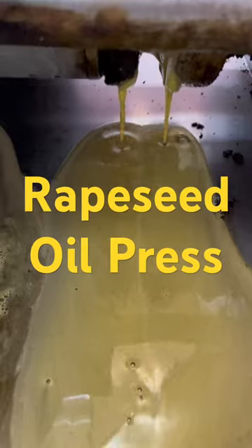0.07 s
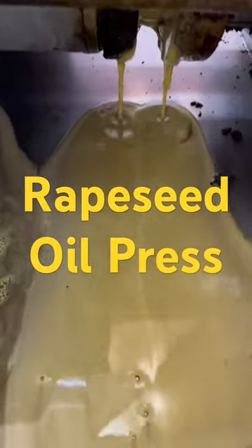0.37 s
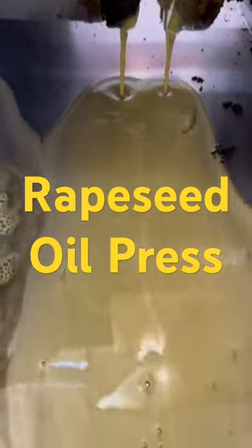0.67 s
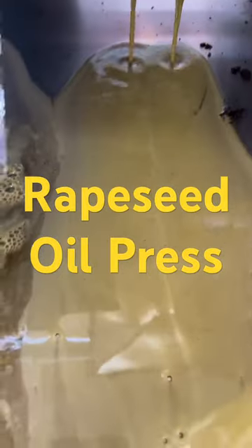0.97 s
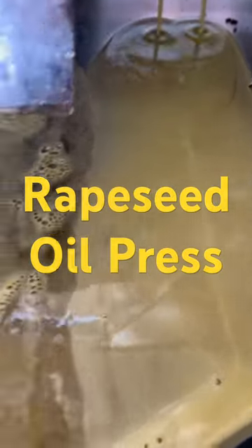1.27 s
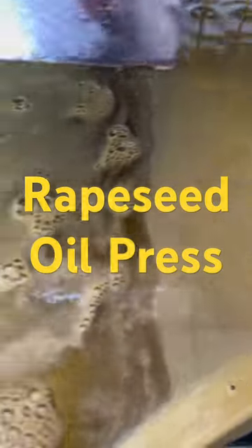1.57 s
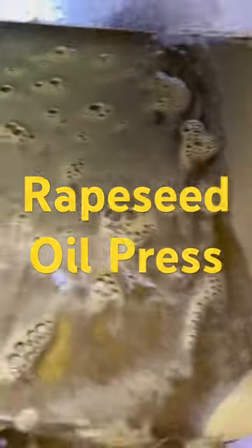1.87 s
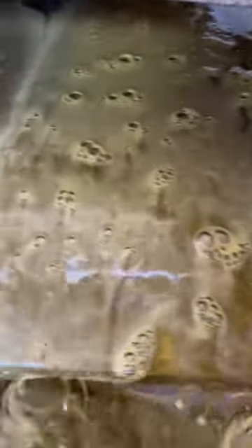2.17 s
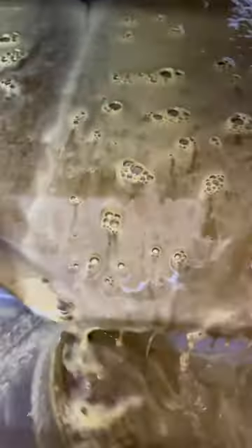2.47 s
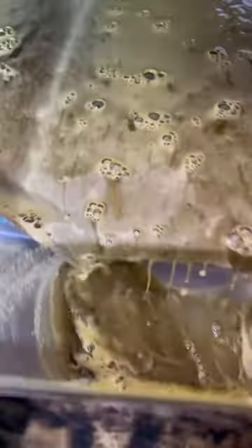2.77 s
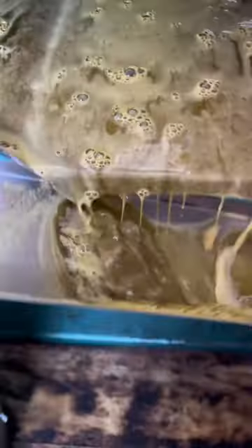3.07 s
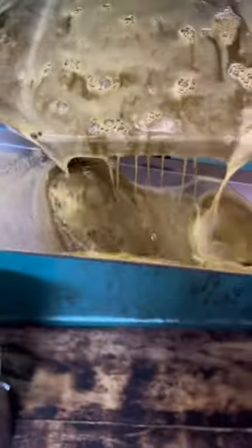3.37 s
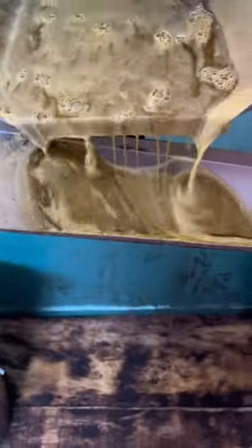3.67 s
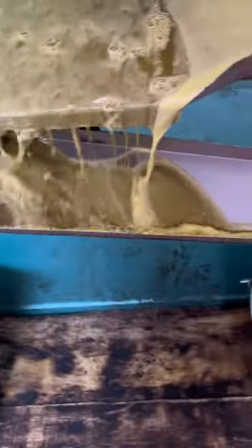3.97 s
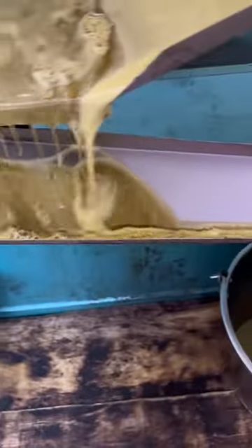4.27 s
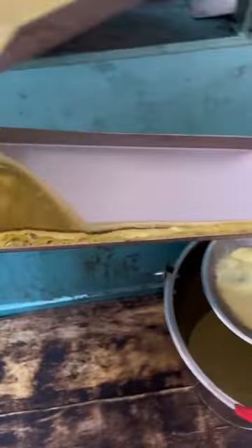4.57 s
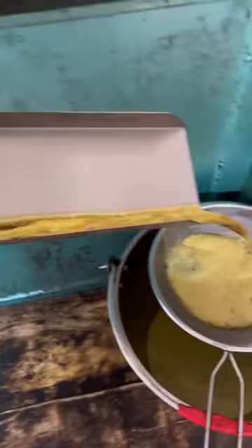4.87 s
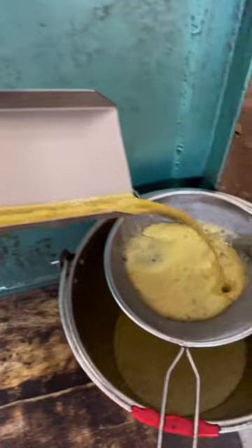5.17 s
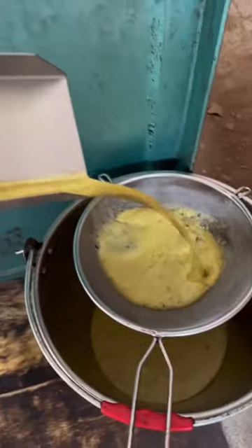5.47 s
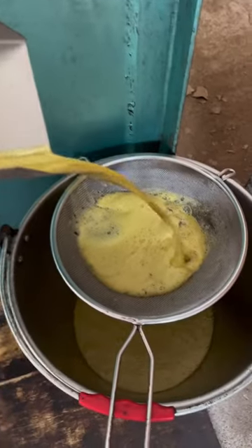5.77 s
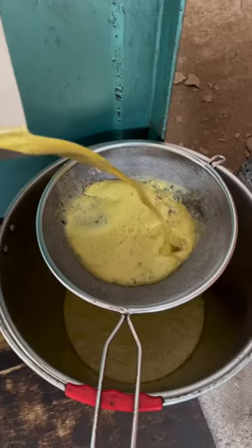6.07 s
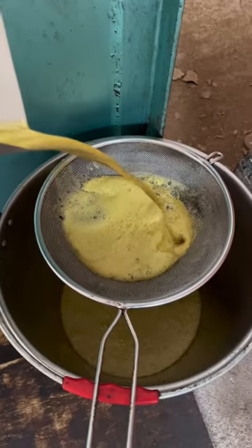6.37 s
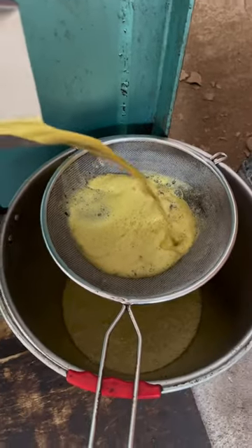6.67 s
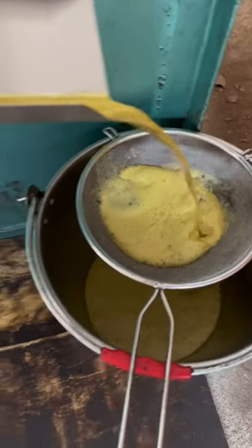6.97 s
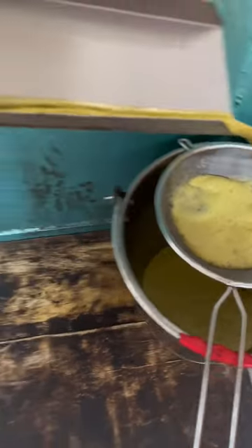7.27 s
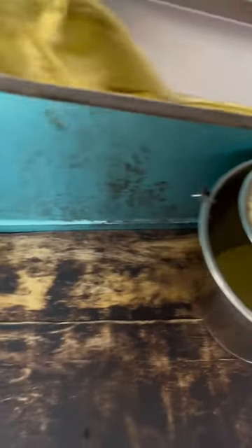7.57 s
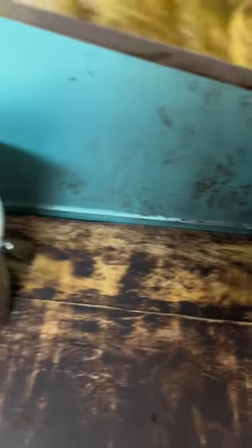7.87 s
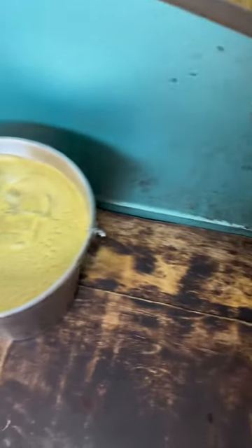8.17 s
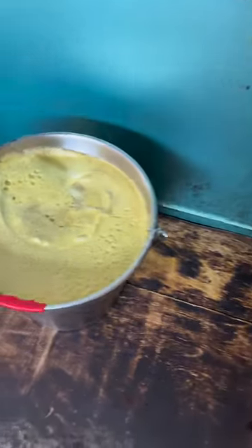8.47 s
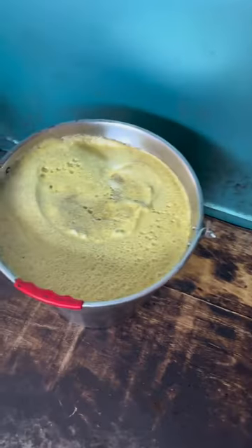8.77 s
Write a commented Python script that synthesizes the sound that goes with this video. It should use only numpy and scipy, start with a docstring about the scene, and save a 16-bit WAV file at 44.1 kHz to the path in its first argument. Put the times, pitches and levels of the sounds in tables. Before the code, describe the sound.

A screw oil press runs throughout in a workshop: a low gear drone and hum, a rumbling frame and a mid-pitched motor whine, with a soft hiss of grinding seed and a very faint fizz of froth above. The whine swells and dips as the microphone moves along the machine, gradually receding. The seed cake gives a faint squeak around 0.7 seconds and a sharp crack at about 1 second. A knock follows at 1.3 seconds, then a quick, louder cluster of clacking thuds at 1.5. From about 3.4 seconds, oil spits in scattered small, bright ticks. Faint scrapes come near 3.8 and 8.5 seconds, with a brief crack at 6.5. Between roughly 4.7 and 7.3 seconds, oil splashes very lightly into a sieve while the low drone grows fuller. The machine is still running at the end, near 9 seconds.

```python
"""Screw oil press in a workshop.

The motor's rotor bars whine over meshing gears and a rumbling frame. The screw grinds seed with a hiss,
the seed cake cracks, something knocks and settles, and the oil froths, spits and splashes faintly.
The listener moves along the oil tray to a sieve, crossing the nodes and crests of the whine."""
import sys
import numpy as np
from scipy import signal
from scipy.fft import rfft, irfft
from scipy.io import wavfile
from scipy.ndimage import uniform_filter1d

SR = 44100
rng = np.random.default_rng(int(sys.argv[2]) if len(sys.argv) > 2 else 0)


def dump(signal):
    """Clip the signal to [-1, 1] and save it as 16-bit WAV at the path in sys.argv[1]."""
    limited = np.clip(np.atleast_2d(signal).T, -1, 1)
    pcm = np.round(limited * 32767).astype(np.int16)
    wavfile.write(sys.argv[1], SR, pcm)


N = 389403
T = np.arange(N) / SR
HZ = np.fft.rfftfreq(N, 1 / SR)

MAINS_HZ, SHAFT_HZ, MESH_HZ = 50., 24.48, 77.18
ROTOR_BARS, PINION_TEETH = 30, 14
PINION_HZ = MESH_HZ / PINION_TEETH
AT_OUTLET_S, AT_BARREL_S, AT_SIEVE_S = (-1, 1.24), (1.215, 1.705), (4.3, 7.1)  # listener's stops


def amp(db):
    """Decibels to gain."""
    return 10 ** (np.asarray(db) / 20)


def unit(x):
    """Scale to rms 1."""
    return x / np.sqrt(np.mean(x ** 2) + 1e-20)


def envelope(points):
    """Gain over time from (time [s], level [dB]) points."""
    return amp(np.interp(T, *np.transpose(points)))


def colour(points):
    """Gain over frequency, interpolated on a log axis."""
    hz, db = np.transpose(points)
    return amp(np.interp(np.log(HZ + 1), np.log(hz), db))


def resonances(modes):
    """Gain over frequency of modes summed in power."""
    return np.sqrt(sum(amp(db) ** 2 / (1 + ((HZ - hz) / width) ** 2) ** 2 for hz, width, db in modes))


def drift(rate_hz):
    """Slow random wander, rms 1."""
    return unit(irfft(rfft(rng.standard_normal(N)) * np.exp(-(HZ / rate_hz) ** 2), N))


def tone(hz, clock, lead_rad=0):
    """Sine of rms 1 on a machine's clock."""
    return np.sqrt(2) * np.cos(2 * np.pi * (hz * clock + rng.random()) + lead_rad)


def shaft_clock(wobble, rate_hz):
    """Time as a shaft keeps it: load makes the speed waver."""
    return T + np.cumsum(wobble * drift(rate_hz)) / SR


# (frequency [Hz], coherence [0-1], left lead [rad], left minus right [dB])
STEREO_FIELD = [(60, .995, 0, -.5), (350, .96, -.2, -1.5), (700, .7, -.3, 1), (1900, .62, -.3, 0),
                (2250, .15, -1.2, -1), (2600, .42, -2.4, -3), (4400, .3, -3.2, -3), (5300, .65, -4, -4),
                (6100, .9, -3.1, 0), (14600, .9, 9.4, 0)]
def stereo(first, second):
    """Mix two unrelated spectra into partly coherent left and right signals."""
    hz, *columns = np.transpose(STEREO_FIELD)
    coherence, lead, tilt_db = (np.interp(HZ, hz, column) for column in columns)
    right = (coherence * first + np.sqrt(1 - coherence ** 2) * second) * np.exp(-1j * lead)
    return irfft(np.array([first * amp(tilt_db / 2), right * amp(-tilt_db / 2)]), N)


def noise(spectrum, repeat=0):
    """Coloured stereo noise, rms 1; a share of its power repeats each pinion turn."""
    white = rng.standard_normal((2, N))
    looped = white[:, np.arange(N) % round(SR / PINION_HZ)]
    shake = np.sqrt(1 - repeat) * white[:, ::-1] + np.sqrt(repeat) * looped
    return unit(stereo(*(rfft(shake) * spectrum)))


def patchy(x, patch_db, size):
    """Bands swell and fade apart; a larger size gives narrower, slower patches."""
    bands = signal.stft(x, nperseg=size)[2]
    field = uniform_filter1d(rng.standard_normal(bands.shape[1:]), size=3, axis=0)
    field = unit(uniform_filter1d(field, size=14, axis=1))
    return unit(signal.istft(bands * amp(patch_db * field), nperseg=size)[1][:, :N])


def near(stop, move_s=.13):
    """1 while the listener is at a stop, ramping to 0 outside it."""
    start, end = stop
    return np.clip(np.minimum(T - start, end - T) / move_s + .5, 0, 1)


def along_tray(levels, wander_db=0):
    """Gain of a source as the listener moves from stop to stop."""
    base_db, *boosts_db = levels
    stops = (AT_OUTLET_S, AT_BARREL_S, AT_SIEVE_S)
    boost_db = sum(db * near(stop) for db, stop in zip(boosts_db, stops))
    return amp(base_db + boost_db + wander_db * drift(.28))


# (time [s], half-width [s], left gain [dB], right gain [dB], phase direction [+-1])
NODES_AND_CRESTS = [(.3, 0.34, -3.5, 1, -1), (1.32, 0.56, -9.5, 0.5, 1), (1.839, 1, -0.5, -22.5, 1),
                    (2.66, 0.16, 2, 3, -1), (3.52, 0.85, -4, -15, -1), (4.53, 0.1, 2.5, 2.5, 1),
                    (5.19, 0.93, -3.5, -23.5, -1), (6.85, 0.79, -2, -15, 1), (7.69, 0.13, 0.5, -11.5, 1),
                    (8.03, 0.24, 1, 4, -1), (8.74, 0.62, -12.5, -9, 1)]
def standing_wave(start_db=(-16.5, -16), recede_db_per_s=-.78):
    """Complex stereo gain of the receding whine: at a node, reflections cancel it and swing its phase."""
    gain = amp(np.array(start_db)[:, None] + recede_db_per_s * T) + 0j
    for s, width, left_db, right_db, direction in NODES_AND_CRESTS:
        depth = 1 - amp([[left_db], [right_db]])
        gain *= 1 - depth / (1 + 1j * np.sign(direction) * (T - s) / width)
    return gain


# (offset [shaft orders], offset [multiples of twice mains], level [dB])
SLOT_SIDEBANDS = [(0, -3, -47), (1, -2, -48.5), (0, 0, -47.8), (1, 1, -53.5), (0, 2, -48.6)]
# (base level [dB], outlet boost [dB], barrel boost [dB], sieve boost [dB])
LOW_SIDEBAND_LEVELS = (-52, 5.5, -10, 10)
# (time [s], level [dB])
OCTAVE_LEVELS = [(1.7, -56), (2.04, -51.5), (2.73, -57.5), (4.11, -47.5), (4.57, -64.5), (5.95, -45.5),
                 (7.18, -59), (7.69, -43.5), (7.73, -53), (8.8, -58)]
# (time [s], relative level [dB])
UPPER_SLOT_LEVELS = [(1.7, -68), (3.34, -51.5), (4.61, -61.5), (4.8, -46), (5.08, -68), (6.07, -53.5),
                     (7.45, -57), (7.91, -63), (8.13, -51), (8.8, -58)]
def motor(flutter_db=-41, upper_slot_hz=1803.6, overtone_db=-63, shimmer=.19):
    """Rotor bars whine past the stator slots, with sidebands from mains and shaft."""
    clock = shaft_clock(wobble=.001, rate_hz=12.2)
    slot_hz = ROTOR_BARS * SHAFT_HZ
    whine_hz = slot_hz + 2 * MAINS_HZ
    wave = standing_wave()
    lead = np.outer([.5, -.5], np.angle(wave[0] / wave[1]))
    load_throb = amp(-46.5) * tone(SHAFT_HZ, clock) + amp(-49) * tone(PINION_HZ, clock)
    flutter = amp(flutter_db) * np.array([drift(4.1), drift(17)])  # room scatter, exposed at nodes
    out = (abs(wave) + load_throb + flutter) * tone(whine_hz, clock, lead)
    for shaft, mains, db in SLOT_SIDEBANDS:
        hz = slot_hz + round(shaft) * SHAFT_HZ + round(mains) * 2 * MAINS_HZ
        out += amp(db + 2 * np.array([drift(1.5), drift(.72)])) * tone(hz, clock)
    out += along_tray(LOW_SIDEBAND_LEVELS) * tone(slot_hz - 4 * MAINS_HZ, clock)
    out += envelope(OCTAVE_LEVELS) * (1 + shimmer * drift(36)) * tone(2 * whine_hz, clock, .4 * lead)
    upper_gain = envelope(UPPER_SLOT_LEVELS) * amp(2.5) * (1 + shimmer * drift(36))
    out += upper_gain * tone(upper_slot_hz, clock, -.4 * lead)
    overtones = drift(14) * tone(2538, clock, 2 * lead) + drift(2.9) * tone(3 * whine_hz, clock, lead)
    return out + amp(overtone_db) * overtones


# mesh harmonic 2: (time [s], level [dB])
BOOM_LEVELS = [(0.1, -22.5), (0.65, -18.5), (1.15, -22.5), (1.6, -29.5), (2.2, -33), (2.7, -24), (3.7, -33),
               (4.75, -22.5), (6.55, -20), (8.2, -31)]
# mesh harmonic 3: (time [s], level [dB])
DRONE_LEVELS = [(2.0, -32.5), (3.6, -36), (5.3, -29.5), (6.5, -26.5), (7.9, -32), (8.7, -26.5)]
# (harmonic number, level [dB], outlet boost [dB], sieve boost [dB])
WEAK_HARMONICS = [(1, -32, 1.5, 1), (4, -46.5, 10, -4), (5, -42.5, -10.5, 2), (6, -41, -7, -13.5),
                  (9, -63, -5, -11)]
def gears(clock, eccentric_rad=.13, scatter_rad=.31):
    """Mesh harmonics sing in the frame; the off-centre pinion sways their phase once a turn."""
    sway = eccentric_rad * tone(PINION_HZ, clock)
    out = envelope(BOOM_LEVELS) * tone(2 * MESH_HZ, clock, sway)
    out += envelope(DRONE_LEVELS) * tone(3 * MESH_HZ, clock, 2 * sway)
    for k, db, outlet_db, sieve_db in WEAK_HARMONICS:
        gain = amp(db + outlet_db * near(AT_OUTLET_S) + sieve_db * near(AT_SIEVE_S) + 2 * drift(1.4))
        out += gain * tone(round(k) * MESH_HZ, clock, np.sqrt(k) * sway + scatter_rad * drift(7))
    return out


# (frequency [Hz], level [dB], outlet boost [dB], sieve boost [dB])
HUM_TONES = [(51.4, -39, -15.5, 2), (70.4, -43.5, 10.5, 1), (73.24, -29.5, -9, -3.5),
             (81.2, -36, -11, -0.5), (99.5, -31, -4.5, 2), (103, -43, -13, 6), (124.8, -31, -0.5, -3),
             (151.6, -35.5, -3, -0.5)]
def hum(clock):
    """Mains, belt and shafts hum in low tones that beat against the gears."""
    out = np.zeros(N)
    for hz, db, outlet_db, sieve_db in HUM_TONES:
        gain = amp(db + outlet_db * near(AT_OUTLET_S) + sieve_db * near(AT_SIEVE_S) + .9 * drift(1.2))
        out += gain * tone(hz, clock)
    return out


def drive():
    """Gears and hum on one wavering clock, slightly to the right."""
    clock = shaft_clock(wobble=.00085, rate_hz=4.1)
    return (gears(clock) + hum(clock)) * amp([[-.6], [.6]])


# (frequency [Hz], relative level [dB])
RUMBLE_SPECTRUM = [(20, -20), (40, -15.5), (52, 4), (85, 6), (195, -2), (270, 3), (440, -1), (510, -4),
                   (850, -6), (1200, -14.5), (2000, -50.5)]
# both: (frequency [Hz], half-width [Hz], relative level [dB])
FRAME_MODES = [(112, 14, 8.5), (132.6, 8.5, 10), (150.6, 10, 9.5), (172.2, 9, 11), (224, 16, 9),
               (399, 49, 1)]
CHURN_MODES = [(370, 25, 0)]
# both: (relative level [dB], outlet boost [dB], barrel boost [dB], sieve boost [dB])
BODY_LEVELS = (-20.5, 1.5, 0, -0.5)
PANEL_LEVELS = (-26.5, 3.5, 3, 0.5)
# (time [s], level [dB])
CHURN_LEVELS = [(3.9, -48), (4.5, -32.5), (6.5, -33.5), (7.8, -38.5), (8.2, -33)]
def frame(split_hz=260, repeat=.3, recede_db_per_s=-.16):
    """The screw shakes the frame: the body booms, the panels rattle and one of them churns."""
    spectrum = colour(RUMBLE_SPECTRUM) * np.sqrt(1 + resonances(FRAME_MODES) ** 2)
    low_share = 1 / (1 + (HZ / split_hz) ** 8)
    body = noise(spectrum * np.sqrt(low_share), repeat)
    body *= along_tray(BODY_LEVELS, wander_db=1.56) * amp(-3)
    # standing waves pick out narrow bands that shift as the listener moves
    panels = patchy(noise(spectrum * np.sqrt(1 - low_share), repeat), patch_db=4, size=8192)
    panels *= along_tray(PANEL_LEVELS) * amp(-1.78 + recede_db_per_s * T)
    churn = noise(resonances(CHURN_MODES)) * envelope(CHURN_LEVELS)
    throb = 1 + .024 * tone(MESH_HZ, T) + .087 * tone(SHAFT_HZ, T)
    return (body + panels + churn) * throb


# (frequency [Hz], relative level [dB])
GRIND_SPECTRUM = [(400, -9), (1000, 1.5), (1300, 5), (1550, 1), (1800, 1.1), (2100, -4), (2550, -2),
                  (3000, -5.5), (4000, -7.5), (5300, -9), (6300, -45.5), (9000, -25)]
# (relative level [dB], outlet boost [dB], barrel boost [dB], sieve boost [dB])
GRIND_LEVELS = (-45.5, 1.5, 4, 1)
def grinding():
    """Seed crushed in the barrel hisses in shifting patches, pulsing slightly with the gear teeth."""
    hiss = patchy(noise(colour(GRIND_SPECTRUM)), patch_db=2, size=1024)
    pulse = 1 + .049 * tone(MESH_HZ, T)
    return hiss * pulse * along_tray(GRIND_LEVELS) * amp(5 + 1.23 * drift(26))


# (frequency [Hz], relative level [dB])
FROTH_SPECTRUM = [(3000, -10), (6000, 20), (7300, 22), (9000, 15), (12000, -24.5), (13800, -8),
                  (15500, -18)]
# (time [s], relative level [dB])
FROTH_LEVELS = [(0.3, -63.5), (1.72, -58), (1.83, -69.5), (2.55, -62.5), (3.55, -67), (3.73, -62),
                (6.2, -66.5), (7.0, -63), (7.6, -65.5), (8.4, -62)]
def froth(bubbles_per_s=150, sieve_extra_per_s=90, spread_db=7.5):
    """Tiny bubbles burst in a fine hiss, more of them where oil falls into the sieve."""
    at_sieve, spectrum = near(AT_SIEVE_S), colour(FROTH_SPECTRUM)
    strength = amp(spread_db * np.minimum(rng.exponential(1, (2, N)), 4) + 4 * at_sieve)
    bursts = strength * (rng.random((2, N)) < (bubbles_per_s + sieve_extra_per_s * at_sieve) / SR)
    fizz = unit(stereo(*(rfft(bursts) * spectrum)))
    hiss = patchy(noise(spectrum), patch_db=2.5, size=512) * amp(2.16 * drift(27))
    return (amp(6) * hiss + amp(-6) * fizz) * envelope(FROTH_LEVELS)


# (time [s], level [dB], t60 [s], centre [Hz], half-width [Hz])
CAKE_BURSTS = [(0.725, -48, 0.35, 7370, 250), (0.838, -54, 0.11, 5500, 2500),
               (1.053, -34.5, .09, 2500, 5000), (3.77, -46.5, 1.9, 3330, 1600),
               (6.478, -38, 0.33, 2300, 2180), (8.47, -43.5, 3.9, 2440, 1100)]
def seed_cake(rise_s=.0023):
    """Seed cake cracks, squeaks and scrapes in the barrel: decaying bands of noise."""
    out = np.zeros((2, N))
    for s, db, t60, hz, width in CAKE_BURSTS:
        age = np.maximum(T - s, 0)
        attack = 1 - np.exp(-age / rise_s)
        out += noise(resonances([(hz, width, 0)])) * attack * amp(db - 60 * age / t60)
    return out


# (frequency [Hz], half-width [Hz], relative level [dB])
CASING_MODES = [(166, 33, 9), (450, 81, 13), (623, 350, -1), (1270, 230, -12), (1950, 350, -26),
                (3270, 5900, -27)]
# (frequency [Hz], relative level [dB], t60 [s])
THUD_MODES = [(474, 0, .06), (415, -1, .11)]
# (time [s], ring level [dB], ring t60 [s], clack re ring [dB], thud re ring [dB])
BLOWS = [(1.255, -31, .35, -3, -10), (1.49, -26, .2, -4, -12), (1.499, -23, .28, -5, 6),
         (1.514, -23.5, .45, -9, -12)]
def knocks(rise_s=.002, clack_hz=1850, clack_half_width_hz=850, clack_t60_s=.12):
    """At each blow a panel thuds and clacks, and the casing rings away in the room."""
    out = np.zeros((2, N))
    casing = noise(resonances(CASING_MODES))
    bright = noise(resonances([(clack_hz, clack_half_width_hz, 0)]))
    for s, db, t60, clack_db, thud_db in BLOWS:
        age = np.maximum(T - s, 0)
        # two close modes start opposed, so the thud swells, then beats
        thud = sum(sign * amp(thud_db + mode_db - 60 * age / mode_t60) * np.sin(2 * np.pi * hz * age)
                   for sign, (hz, mode_db, mode_t60) in zip((1, -1), THUD_MODES))
        clack = bright * amp(clack_db - 60 * age / clack_t60_s)
        ring = casing * amp(-60 * age / t60)
        out += amp(db) * (1 - np.exp(-age / rise_s)) * (thud + clack + ring)
    return out


# (time [s], relative peak [dB], centre [Hz])
OIL_SPITS = [(3.3982, -42.5, 13000), (3.6757, -44, 9500), (4.1021, -43, 8030), (4.6194, -42, 6500),
             (5.2046, -40.5, 11200), (5.2739, -36.3, 9080), (5.6565, -39, 7500), (7.2015, -42.5, 8720),
             (7.4011, -38, 11500), (8.5245, -35, 13500)]
def spits(snap_t60_s=.012, patter_t60_s=.14, half_width_hz=3400, gain_db=5):
    """Oil spits with a bright snap, then the thrown droplets patter."""
    out, t = np.zeros((2, N)), T[:4096]
    hz = np.fft.rfftfreq(len(t), 1 / SR)
    for s, db, centre_hz in OIL_SPITS:
        band = 1 / (1 + ((hz - centre_hz) / half_width_hz) ** 2)
        patter_db = -12 + 3.5 * unit(uniform_filter1d(rng.standard_normal(len(t)), size=64))
        decay = amp(-60 * t / snap_t60_s) + amp(patter_db - 60 * t / patter_t60_s)
        burst = rng.standard_normal(len(t)) + .5 * rng.standard_normal((2, len(t)))  # mostly centred
        spit = irfft(rfft(burst) * band) * decay
        start = round(s * SR)
        out[:, start:start + len(t)] += amp(db + gain_db) * spit / abs(spit).max()
    return out


# (peak time [s], level [dB])
OIL_SPLASHES = [(4.69, -60), (5.08, -62), (5.43, -58.5), (5.93, -60), (6.12, -59.5), (6.295, -57.5),
                (6.42, -59.5), (6.56, -59.5), (6.79, -58.5), (7.02, -61), (7.19, -59), (7.305, -57)]
def splashes(drops_per_s=320, swell_s=.018, centre_hz=9000, half_width_hz=5500):
    """Oil falls into the sieve; each splash is a cloud of tiny drops that swells and fades."""
    flow = sum(amp(db) * np.exp(-abs(T - s) / swell_s) for s, db in OIL_SPLASHES)
    drops = rng.standard_normal((3, N)) * (rng.random((3, N)) < drops_per_s / SR)
    cloud = drops[2] + .5 * drops[:2]  # mostly centred
    return flow * unit(irfft(rfft(cloud) * resonances([(centre_hz, half_width_hz, 0)]), N))


def scene():
    """The running press and its oil."""
    return motor() + drive() + frame() + grinding() + froth() + seed_cake() + knocks() + spits() + splashes()


def record(dry):
    """The sound opens after 36 ms of silence and is low-passed at 15.6 kHz."""
    fade_in = np.clip((T - .036) / .002, 0, 1)
    lowpass = signal.firwin(511, 15600, window=("kaiser", 9), fs=SR)
    return signal.oaconvolve(dry * fade_in, lowpass[None], "same")


dry = scene()
out = record(dry)
dump(out)
```